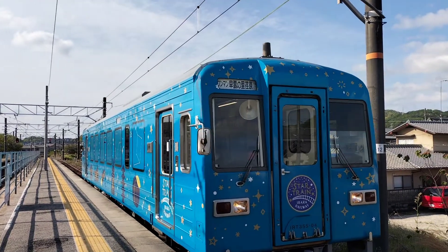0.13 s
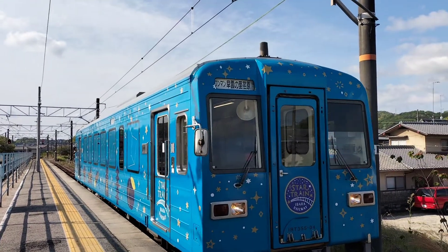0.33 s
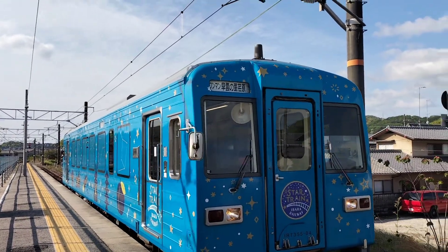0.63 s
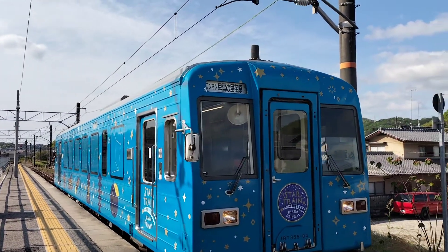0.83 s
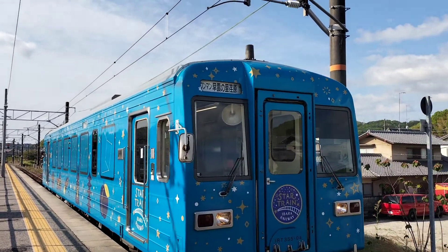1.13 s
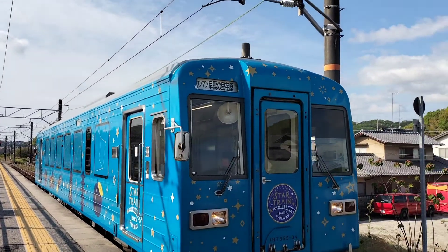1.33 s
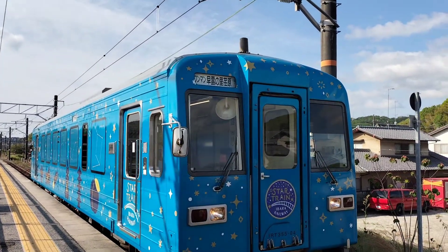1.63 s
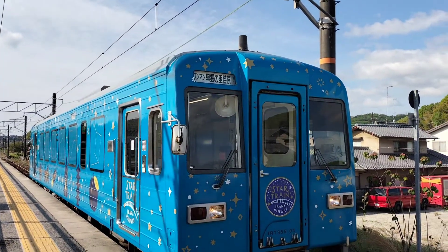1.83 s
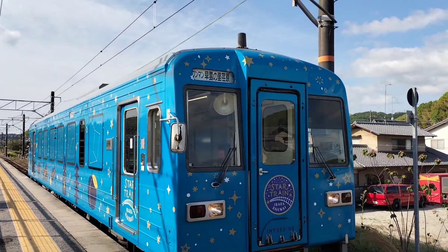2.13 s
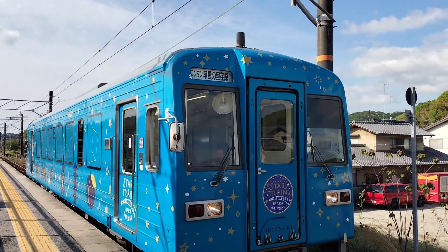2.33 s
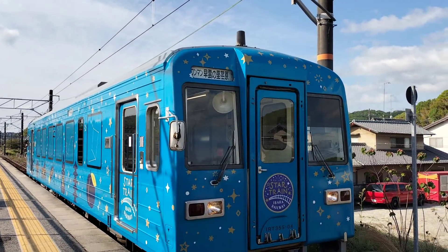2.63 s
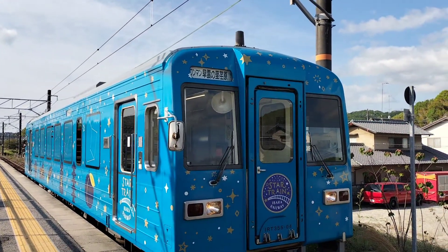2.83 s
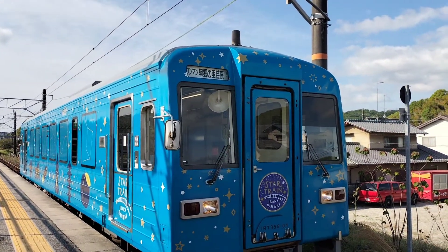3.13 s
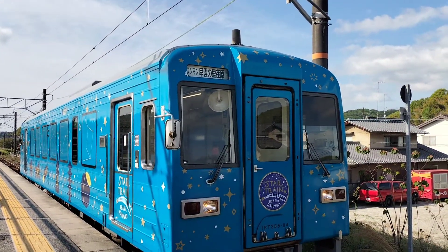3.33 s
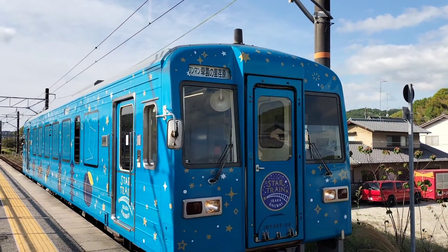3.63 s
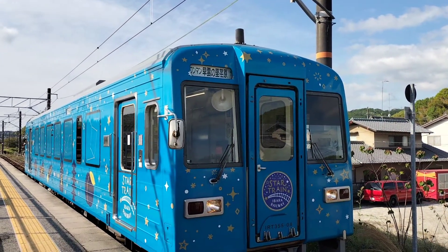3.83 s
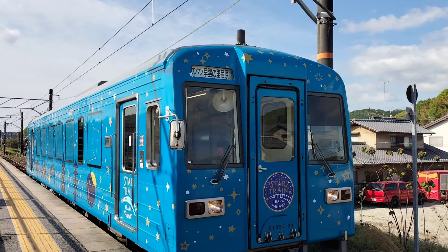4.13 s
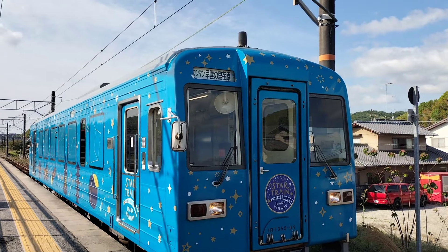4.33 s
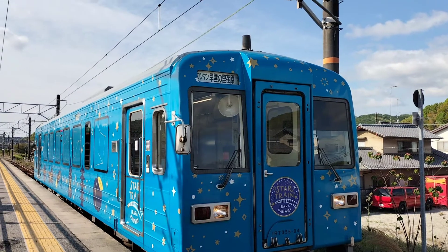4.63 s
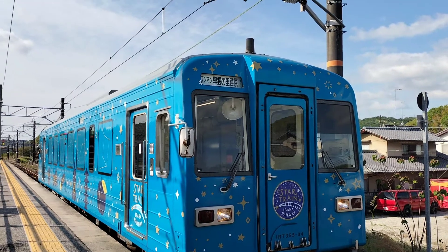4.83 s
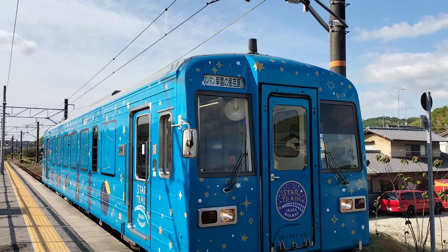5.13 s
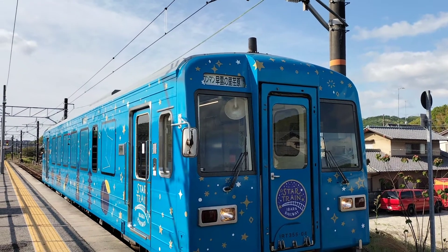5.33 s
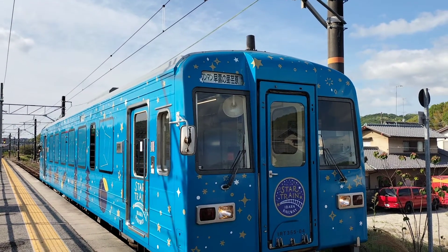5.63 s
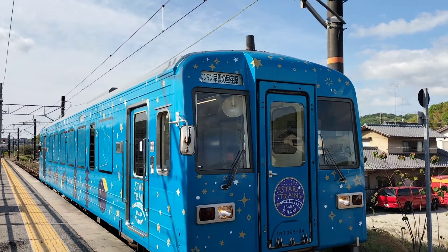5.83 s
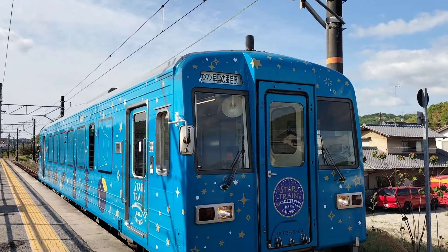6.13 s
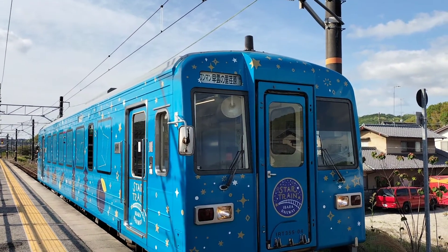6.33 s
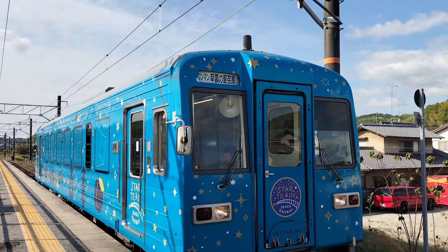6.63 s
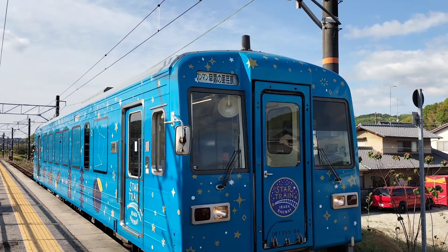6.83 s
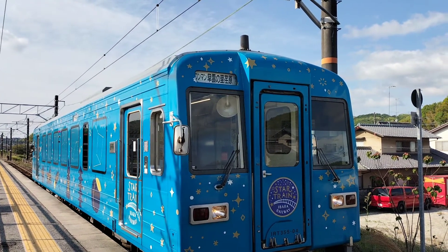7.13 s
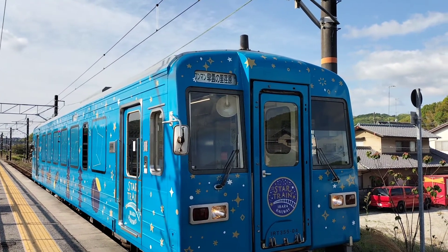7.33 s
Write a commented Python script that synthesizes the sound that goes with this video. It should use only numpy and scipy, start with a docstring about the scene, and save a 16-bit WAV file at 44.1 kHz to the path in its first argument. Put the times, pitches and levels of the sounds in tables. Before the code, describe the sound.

An outdoor, fairly dry mono perspective beside a diesel railcar at a platform. From the start its engine drones beneath thin metallic wheel tones and scraping shoes. By about 0.3 s high wheel notes sing out, and from 0.45 to 1.4 s a loud, piercing squeal around 2.3 kHz surges, dips and stutters, its bright overtones strongest near 1.2 s. Low wheel rumble swells around 1.2 s. The squeal rises slightly and weakens by 1.6 s; a short, lower squeaky chirp pops at about 1.8 s as the wheels stop, leaving faint high ringing that dies away. From 2 s to the end near 7.5 s, the much quieter engine idles evenly: low hum, fast throbbing drone, muffled knocking and dry clatter, easing slightly until 4 s. Light compressor ticks come about seven per second, a few sharper around 4 to 5 s. Brake air is nearly inaudible.

```python
"""Brake shoes squeal on the steel wheels of a diesel railcar rolling its last metres along an open platform.
The squeal is a wavering tone with overtones; wheel modes sing as enveloped sines; short chirps break in
during the squeal and at the stop. Wheel rumble and shoe rub are coloured noise. The six-cylinder engine idles
throughout: sines on the firing phase plus noise bursts per cylinder. A compressor ticks (resonant noise strokes)
and brake air hisses faintly."""
import sys
import numpy as np
from scipy import signal
from scipy.fft import rfft, irfft, next_fast_len
from scipy.io import wavfile
from scipy.ndimage import map_coordinates

SR = 44100
rng = np.random.default_rng(int(sys.argv[2]) if len(sys.argv) > 2 else 0)


def inscribe(sig):
    """Save sig as 16-bit PCM at rate SR to the path in sys.argv[1].

    A 1-D sig is mono; a 2-D sig holds one channel per row.
    Samples are clipped to [-1, 1] before scaling.
    """
    pcm = np.round(np.clip(np.atleast_2d(sig).T, -1, 1) * 32767)
    wavfile.write(sys.argv[1], SR, pcm.astype(np.int16))


N = 329427
TIME = np.arange(N) / SR
FIRING_HZ = 33.78
TOP_HZ = 15800

# main squeal, sinking as the wheel slows, then climbing and weakening: time_s, pitch_hz, level_db
SQUEAL_TRACK = [(0.115, 2466, -39), (0.21, 2463, -28), (0.3, 2440, -27), (0.44, 2374, -25),
                (0.46, 2362, -13.5), (0.56, 2331, -21), (0.71, 2305, -16.8), (0.79, 2323, -15.2),
                (0.87, 2308, -14.3), (0.96, 2286, -23), (1.09, 2287, -24), (1.135, 2298, -15.5),
                (1.19, 2306, -14.5), (1.25, 2288, -17.5), (1.29, 2282, -27.5), (1.415, 2303, -19),
                (1.46, 2350, -28.5), (1.585, 2388, -29), (1.61, 2393, -39.5), (1.85, 2393, -46),
                (1.94, 2393, -60)]
# shoe bite, sets the overtones: time_s, bite_db
BITE_TRACK = [(0.1, -16), (.38, -12.5), (.54, -10), (.73, -4), (.86, -14.5), (.99, -3), (1.2, 0.5),
              (1.43, -4.5), (1.52, -26), (1.94, -63)]
# squeal overtones: multiple, level_db (at 0 dB bite), growth_db_per_db
SQUEAL_OVERTONES = [(2, -33.5, 0.89), (3, -43, 2.5), (4, -55.5, 2), (5, -73, 1.6), (6, -82.5, 0.5)]
# shoe lets go (negative) or snatches (positive): time_s, change_db, half_width_s
SHOE_SLIPS = [(0.186, -20, .012), (0.211, 4, .009), (0.26, -18, .017), (0.406, -7, .009), (0.53, -6, .01),
              (0.662, -4, .008), (1.026, -7, .008), (1.436, -13, .007), (1.473, -7, .005), (1.78, -8, .03)]
# steel wheel modes: pitch_hz, t60_s
WHEEL_MODES = [(2288, .4), (2546, .45), (2606, .45), (2639, .6), (2945, .5), (3340, .3), (3746, .15),
               (4110, .25), (4958, .17), (5110, .55), (5212, .4), (5450, .15), (6683, .42), (6845, .6),
               (7270, .32), (7920, 1.2), (9939, .35), (10420, .35), (11145, 1.5), (14955, 1.3)]
# a shoe makes the nearest mode sing: start_s, mode_hz, rise_s, hold_s, level_db
SINGING_SPELLS = [(0, 2639, 0.0044, 0.08, -41), (0, 3746, .11, .06, -46.5), (0, 4110, 0.037, 0.018, -55),
                  (0, 4958, 0.0084, 0.3, -37.5), (0, 5110, .04, .23, -46.5), (0, 7270, 0.0028, .01, -51.5),
                  (0, 9939, 0.044, 1.4, -67), (0, 10420, 0.014, 0.048, -70), (0, 11145, .02, .33, -84),
                  (0, 14955, .25, .03, -79.5), (.03, 7920, .08, .4, -77), (.08, 2945, 0.19, .22, -51),
                  (.2, 3746, 0.029, .012, -43.5), (0.277, 3746, 0.072, 0.18, -50),
                  (0.314, 3340, 0.056, .14, -29), (.29, 4958, 0.041, 0.12, -34),
                  (.32, 6683, 0.06, .03, -49), (0.452, 5450, 0.076, .05, -45.5), (.5, 5212, 0.37, .25, -57),
                  (0.508, 4958, .02, 0.14, -53.5), (0.681, 3340, 0.043, .02, -45),
                  (0.679, 2546, .08, .6, -50), (0.704, 2606, 0.11, 0.6, -54), (.82, 5110, 0.094, .12, -61),
                  (.65, 7920, .08, .08, -82), (0.861, 4958, .05, .03, -50.5), (1.222, 9939, 0.1, 0.31, -54),
                  (1.262, 2606, 0.09, 0.44, -46), (1.268, 2546, .12, 0.27, -44.5),
                  (1.2, 14955, .35, .28, -90), (1.331, 6845, 0.082, 0.011, -55),
                  (1.35, 5212, .27, .05, -54.5), (1.4, 5110, 0.13, 0.41, -66.5),
                  (1.43, 2288, 0.036, .13, -43), (1.81, 9939, 0.065, 0.12, -67.5),
                  (1.95, 9939, 0.16, 0.38, -78.5)]
# short shoe grabs: start_s, start_hz, settled_hz, level_db, rise_s, hold_s, t60_s
SHOE_CHIRPS = [(0.219, 1385, 1410, -51, 0.032, 0.051, .2), (0.826, 1970, 1915, -40.5, 0.074, 0.024, .22),
               (0.84, 6730, 6510, -56, 0.047, 0.045, 0.17), (0.862, 4300, 4190, -52, .04, .08, 0.25),
               (1.562, 4790, 4770, -46, 0.021, 0.0081, .1), (1.762, 1816, 1720, -28, 0.014, .007, .05),
               (1.788, 1723, 1710, -23.5, 0.013, 0.022, .13), (1.901, 1743, 1732, -50.5, 0.06, .08, 0.18)]
# chirp partials: multiple, relative_db
CHIRP_PARTIALS = [(1, -1.5), (2, -23), (3, -28.5), (4, -45), (5, -58.5)]
# wheels on the rails: time_s, level_db
ROLL_TRACK = [(0, -64), (.5, -59.5), (.9, -47), (1.25, -44), (1.55, -49), (1.85, -51.5), (2.2, -68)]
# wheel rumble spectrum: freq_hz, relative_db
ROLL_SPECTRUM = [(70, -22.5), (110, -14), (210, -22), (320, 2), (560, -13), (820, -2), (1150, -3.5),
                 (1700, -20)]
# shoes rubbing: time_s, level_db
RUB_TRACK = [(0, -48), (.2, -52.5), (.33, -48), (.55, -50), (1.0, -53.5), (1.55, -51), (1.85, -54),
             (2.1, -86)]
# shoe rub spectrum: freq_hz, relative_db
RUB_SPECTRUM = [(700, -27.5), (1300, 0.5), (2000, -8), (4400, -4.5), (5600, -19.5), (8000, -32.5),
                (15000, -45)]
# engine load, easing to idle: time_s, load_0_to_1
LOAD_TRACK = [(0, 0.85), (1.3, 0.93), (1.9, 0.46), (4, 0)]
# engine orders: multiple (of the firing rate), level_db
ENGINE_ORDERS = [(1, -77.5), (4.5, -62.5), (8, -62), (9.5, -60), (16, -68), (23, -57.5), (24, -56),
                 (31.5, -64), (35, -65)]
# exhaust boom: idle_db, added_db (at full load)
BOOM_LEVEL = (-56.3, 4.4)
# exhaust drone: idle_db, added_db (at full load)
DRONE_LEVEL = (-48, 1.6)
# knocking block: idle_db, added_db (at full load)
BLOCK_LEVEL = (-48, 3)
# drone spectrum, shared with the hollow underframe: freq_hz, relative_db
DRONE_SPECTRUM = [(28, -39), (48, -21), (75, -4.5), (95, -11.5), (130, -4.5), (205, -9.5), (265, 0.5),
                  (290, -4.5), (320, 4), (360, -2.5), (440, -6), (570, -16.5), (800, -37)]
# engine block spectrum: freq_hz, relative_db
BLOCK_SPECTRUM = [(400, -10.5), (570, -9.5), (700, 0), (820, 2.5), (930, -4), (1050, 0), (1180, -3),
                  (1340, -9), (1550, -18), (2200, -27.5)]
# valve and injector spectrum: freq_hz, relative_db
CLATTER_SPECTRUM = [(880, -23), (1500, 2), (1960, -6), (2180, -5.5), (2360, -0.5), (2820, -6), (3110, -4),
                    (3930, -3), (4380, -11.5), (6440, -27.5), (7030, -26), (7680, -36), (9080, -35.5),
                    (15800, -56.5)]
# louder compressor strokes: time_s, relative_db (before the compressor trim)
LOUD_TICKS = [(2.598, -47.5), (3.0056, -50), (3.1477, -52), (3.6804, -50), (3.9684, -48), (4.102, -44),
              (4.2418, -47), (4.5166, -47), (4.6533, -48), (4.791, -48), (6.4323, -46), (7.3941, -50)]
# brake valve hisses: start_s, end_s, level_db
AIR_HISSES = [(0.264, 0.38, -75), (1.529, 1.55, -83.5), (5.42, 6.03, -91), (7.276, 7.6, -86.5)]
# air hiss spectrum: freq_hz, relative_db
AIR_SPECTRUM = [(4000, -22.5), (7000, -3.5), (10500, -9.5), (12000, 0.5), (13000, -3), (15500, -13)]


def amp(db):
    """Amplitude ratio of a level in dB."""
    return 10 ** (np.asarray(db) / 20)


def unit(x):
    """x scaled to rms 1."""
    return x / np.sqrt(np.mean(x ** 2) + 1e-20)


def curves(rows):
    """One value per sample for each column after the time."""
    time_s, *columns = np.transpose(rows)
    return [np.interp(TIME, time_s, column) for column in columns]


def gate(start_s, end_s, fade_s=0.026):
    """1 between start and end, linear fades just outside."""
    return np.clip(np.minimum(TIME - start_s, end_s - TIME) / fade_s + 1, 0, 1)


def swell(t, rise_s, hold_s, t60_s):
    """Friction tone envelope from t = 0: builds, holds, rings out."""
    attack = np.sin(np.pi / 2 * np.clip(t / rise_s, 0, 1)) ** 2
    return attack * np.exp(-np.log(1000) * np.maximum(t - rise_s - hold_s, 0) / t60_s)


def wobble(knots_per_s):
    """Smooth random curve through Gaussian knots."""
    knots = rng.standard_normal(int(N * knots_per_s / SR) + 4)
    return map_coordinates(knots, [TIME * knots_per_s])


def angle(hz):
    """Running phase of a moving frequency, random start."""
    return 2 * np.pi * (np.cumsum(hz) / SR + rng.random())


def tone(phase, db):
    """Sine of the given rms level."""
    return np.sqrt(2) * amp(db) * np.sin(phase)


def noise():
    """Fresh white noise."""
    return rng.standard_normal(N)


def filtered(x, response):
    """x through a frequency response."""
    size = next_fast_len(N + 8192)
    return irfft(rfft(x, size) * response(np.fft.rfftfreq(size, 1 / SR)), size)[:N]


def coloured(x, spectrum):
    """x shaped by a spectrum, closed an octave outside it, at rms 1."""
    freq_hz, db = np.transpose(spectrum)
    log_hz = np.log(np.r_[freq_hz[0] / 2, freq_hz, freq_hz[-1] * 2])
    closed_db = np.r_[-120, db, -120]
    return unit(filtered(x, lambda hz: amp(np.interp(np.log(hz + 1), log_hz, closed_db))))


def squeal(scatter=.37, scatter_rate=16, rasp_db=1.5):
    """Stick-slip of shoe on tread: a shrill tone, steady when strong, ragged when weak; overtones stutter."""
    jitter_hz, flutter_db = 3.5, .55
    hz, db = curves(SQUEAL_TRACK)
    bite_db, = curves(BITE_TRACK)
    ragged = 1 + np.clip((-19 - db) / 4, 0, 2)
    phase = angle(hz + jitter_hz * ragged * wobble(90))
    out = tone(phase, db + flutter_db * ragged * wobble(90))
    for multiple, level_db, growth in SQUEAL_OVERTONES:
        # complex fading: random level and phase
        fading = 1 + scatter * (wobble(scatter_rate) + 1j * wobble(scatter_rate))
        overtone_db = level_db + growth * bite_db + rasp_db * wobble(180)
        out += np.abs(fading) * tone(multiple * phase + np.angle(fading), overtone_db)
    grip_db = sum(change_db * np.exp(-((TIME - s) / width_s) ** 2) for s, change_db, width_s in SHOE_SLIPS)
    return out * amp(grip_db) * gate(SQUEAL_TRACK[0][0], SQUEAL_TRACK[-1][0])


def wheels(drift=0.00099, flutter_db=2.5, flutter_hz=5000):
    """Wheel modes sing at nearly fixed pitch; they waver while turning, high modes most, then ring smoothly."""
    mode_hz, t60_s = np.transpose(WHEEL_MODES)
    envelopes = np.zeros((len(mode_hz), N))
    for start_s, hz, rise_s, hold_s, db in SINGING_SPELLS:
        mode = np.abs(mode_hz - hz).argmin()
        spell = amp(db) * swell(TIME - start_s, rise_s, hold_s, t60_s[mode])
        envelopes[mode] = np.maximum(envelopes[mode], spell)
    turning = gate(0, 1.4, fade_s=0.15)
    out = np.zeros(N)
    for hz, envelope in zip(mode_hz, envelopes):
        phase = angle(hz * (1 + drift * turning * wobble(40)))
        # flutter_db applies at flutter_hz
        out += envelope * tone(phase, flutter_db * hz / flutter_hz * turning * wobble(36))
    return out


def chirps(settle_s=0.025, jitter_hz=4):
    """A shoe grabs: the tone builds, its pitch slides to rest and it dies away."""
    highest_hz = 9000
    out = np.zeros(N)
    t = np.arange(SR // 2) / SR
    for start_s, start_hz, end_hz, db, rise_s, hold_s, t60_s in SHOE_CHIRPS:
        slide_hz = (start_hz - end_hz) * np.exp(-t / settle_s)
        phase = angle(end_hz + slide_hz + jitter_hz * wobble(120)[:len(t)])
        partials = sum(tone(multiple * phase, db + relative_db)
                       for multiple, relative_db in CHIRP_PARTIALS if multiple * end_hz < highest_hz)
        out[round(start_s * SR):][:len(t)] += swell(t, rise_s, hold_s, t60_s) * partials
    return out


def rolling(body_db=-1.5):
    """Wheel rumble, the hollow underframe it shakes and shoe rub: coloured noise fading as the car stops."""
    roll_db, = curves(ROLL_TRACK)
    rub_db, = curves(RUB_TRACK)
    rumble = coloured(noise(), ROLL_SPECTRUM)
    underframe = amp(body_db) * coloured(noise(), DRONE_SPECTRUM)
    rub = amp(rub_db + .8 * wobble(25)) * coloured(noise(), RUB_SPECTRUM)
    return amp(roll_db) * (rumble + underframe) + rub


def firings(cycles, alike, depth, decay_s):
    """A noise burst per cylinder, six unequal ones a cycle; the share alike repeats every cycle."""
    size, uneven_db = round(6 * SR / FIRING_HZ), 1.2
    cycle_part = cycles % 1
    repeated = rng.standard_normal(size)[(cycle_part * size).astype(int)]
    cylinder, since = np.divmod(cycle_part * 6, 1)  # since: fraction of a firing interval
    strength = amp(uneven_db * rng.standard_normal(6))[cylinder.astype(int)]
    bursts = 1 + depth * strength * np.exp(-since / (FIRING_HZ * decay_s))
    share = np.clip(alike, 0, 1)
    return bursts * (np.sqrt(share) * repeated + np.sqrt(1 - share) * noise())


def engine(order_flutter_db=2, clatter_db=-54):
    """Idling diesel: exhaust boom and drone, crank orders, knocking block and valve clatter on one shaft."""
    hunt, wander_db = .0022, .5
    phase = angle(FIRING_HZ * (1 + hunt * wobble(3)))
    cycles = phase / (2 * np.pi * 6)
    load, = curves(LOAD_TRACK)
    boom_db, drone_db, block_db = (idle_db + added_db * load
                                   for idle_db, added_db in (BOOM_LEVEL, DRONE_LEVEL, BLOCK_LEVEL))

    boom = tone(2 * phase, boom_db + wander_db * wobble(5))
    orders = sum(tone(multiple * phase + 2 * np.pi * rng.random(), db + order_flutter_db * wobble(5.5))
                 for multiple, db in ENGINE_ORDERS)
    drone = coloured(firings(cycles, alike=0.16, depth=0.37, decay_s=0.016), DRONE_SPECTRUM)
    drone *= amp(drone_db + wander_db * wobble(5.9))
    block = amp(block_db) * coloured(firings(cycles, alike=.35, depth=.65, decay_s=.008), BLOCK_SPECTRUM)
    clatter = coloured(firings(cycles, alike=0.049, depth=0.41, decay_s=0.0088), CLATTER_SPECTRUM)
    return boom + orders + drone + block + amp(clatter_db) * clatter


def compressor(soft_db=-53, ring_hz=2550, width_hz=650, decay_s=0.02):
    """Air compressor ticks: decaying noise strokes through a valve resonance, some louder than the rest."""
    period_s, first_beat_s, trim_db = .1375, .113, -4.7
    loud = np.array(LOUD_TICKS)
    beats_s = np.arange(first_beat_s, N / SR, period_s)
    # a loud tick replaces the soft beat nearby
    soft = [(s, soft_db + 2 * rng.standard_normal())
            for s in beats_s if np.abs(loud[:, 0] - s).min() > period_s / 2]
    strokes = np.zeros(N + SR)
    t = np.arange(SR // 10) / SR
    for s, db in [*loud, *soft]:
        strokes[round(s * SR):][:len(t)] += amp(db + trim_db) * np.exp(-t / decay_s)

    def valve(hz):
        """Bandpass resonance with a steep treble roll-off."""
        damping = 1j * hz * width_hz
        resonance = damping / (ring_hz ** 2 - hz * hz + damping)
        return resonance / (1 + (hz / (2 * ring_hz)) ** 8)

    rattle = noise()
    return filtered(strokes[:N] * rattle, valve) / filtered(rattle, valve).std()


def air():
    """Brake air escapes in faint hisses: gated coloured noise."""
    level = sum(amp(db) * gate(start_s, end_s, fade_s=.07) for start_s, end_s, db in AIR_HISSES)
    return level * coloured(noise(), AIR_SPECTRUM)


def platform(x):
    """Faint scattered echoes from car side, platform edge and houses: a decaying noise tail."""
    wet_db, t60_s = -22, .3
    t = np.arange(SR // 2) / SR
    tail = rng.standard_normal(len(t)) * np.exp(-np.log(1000) * t / t60_s) * (t > .005)
    return x + amp(wet_db) * signal.fftconvolve(x, tail / np.linalg.norm(tail))[:N]


def scene():
    """Brakes and wheels, with echoes, over the running machinery."""
    brakes = platform(squeal() + wheels() + chirps())
    return (brakes + rolling() + engine() + compressor() + air())[None]


def record(dry):
    """Sharp lowpass: nothing passes at or above TOP_HZ."""
    return np.array([filtered(channel, lambda hz: hz < TOP_HZ) for channel in dry])


dry = scene()
out = record(dry)
inscribe(out)
```